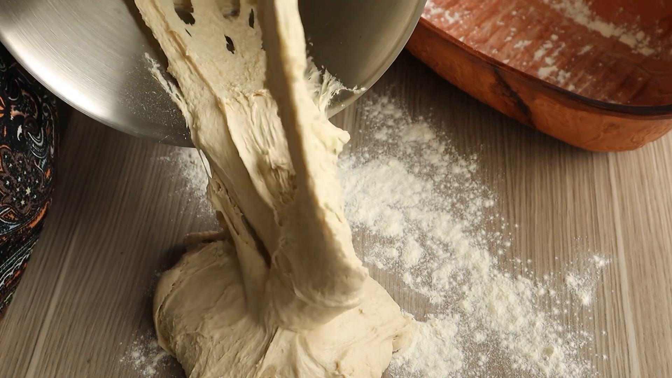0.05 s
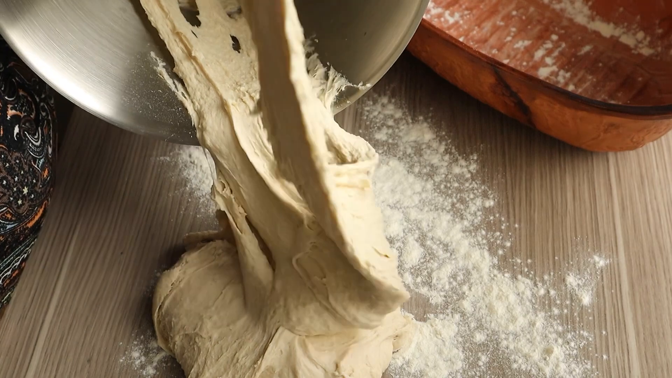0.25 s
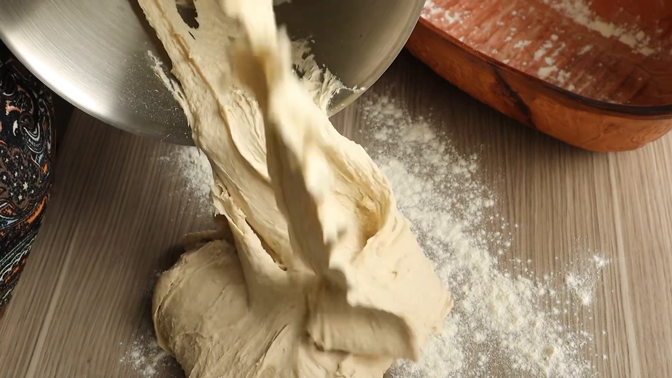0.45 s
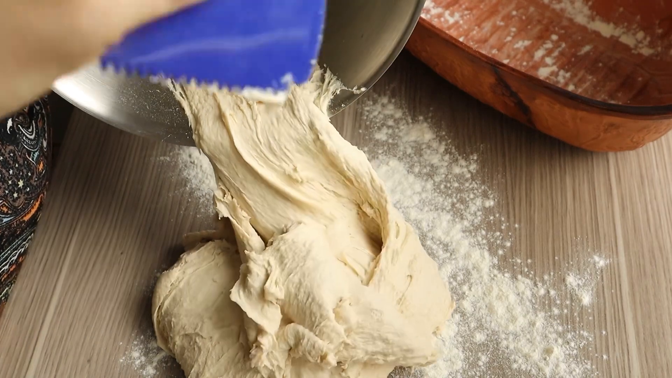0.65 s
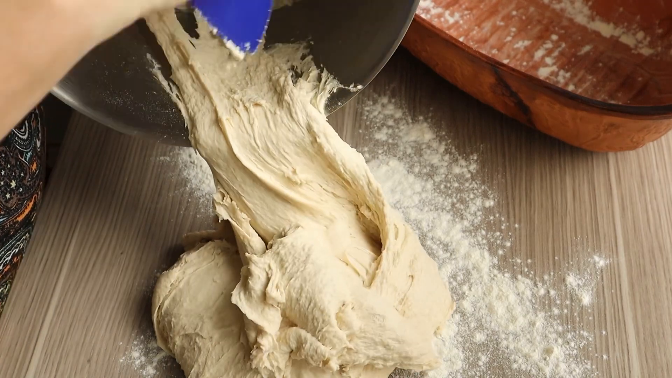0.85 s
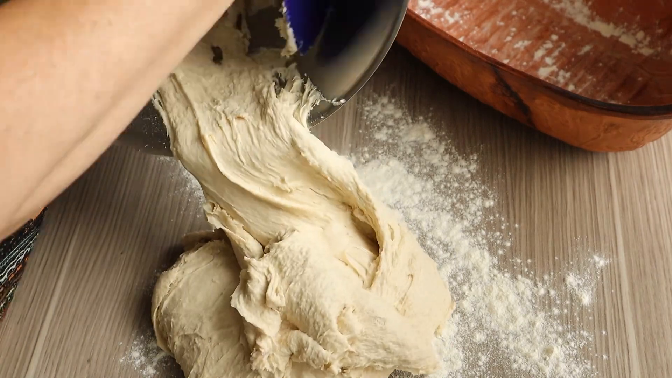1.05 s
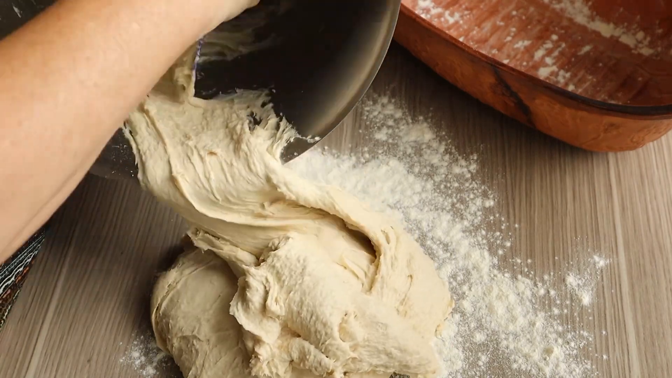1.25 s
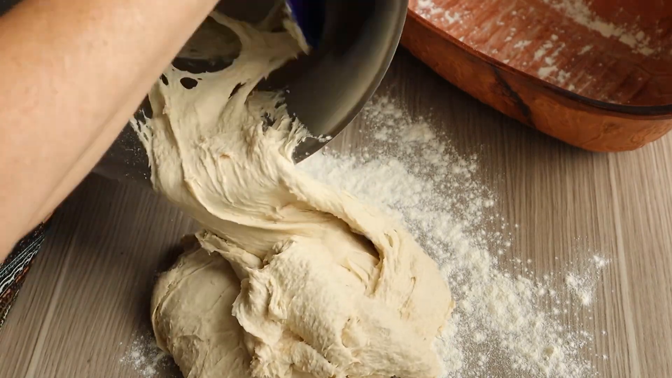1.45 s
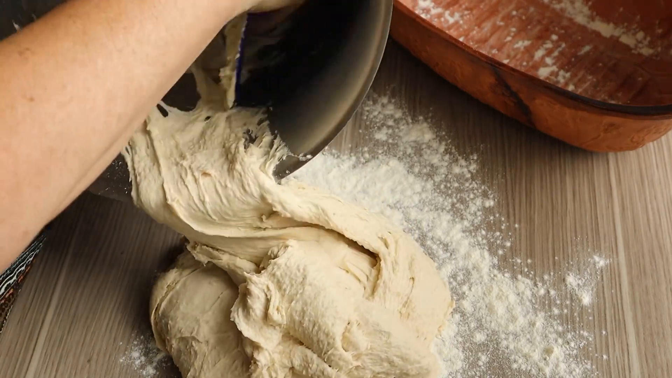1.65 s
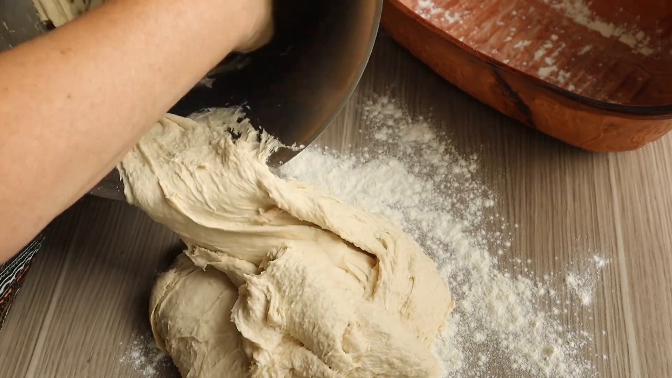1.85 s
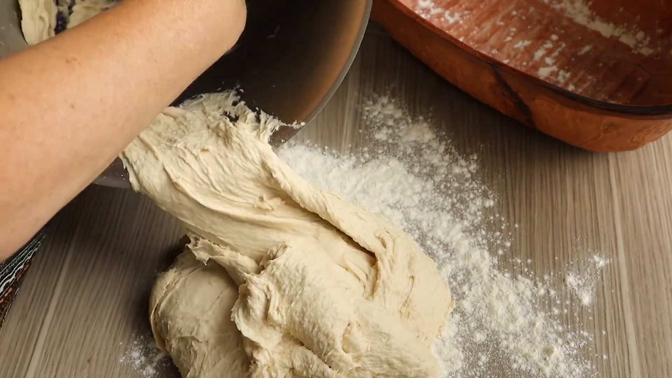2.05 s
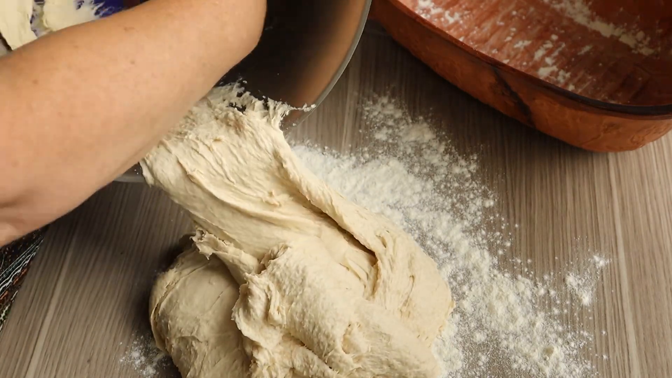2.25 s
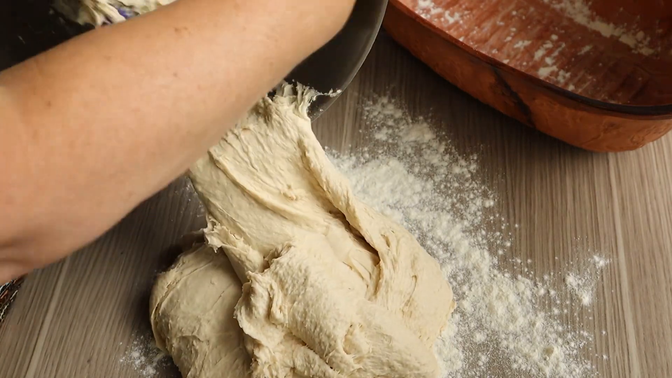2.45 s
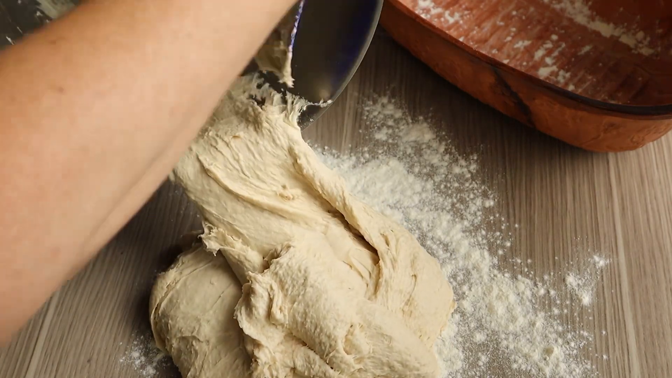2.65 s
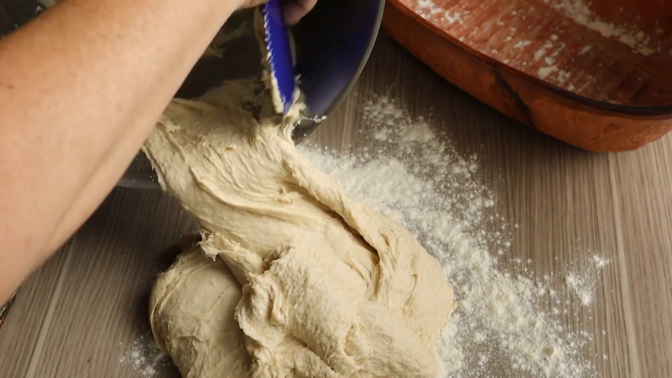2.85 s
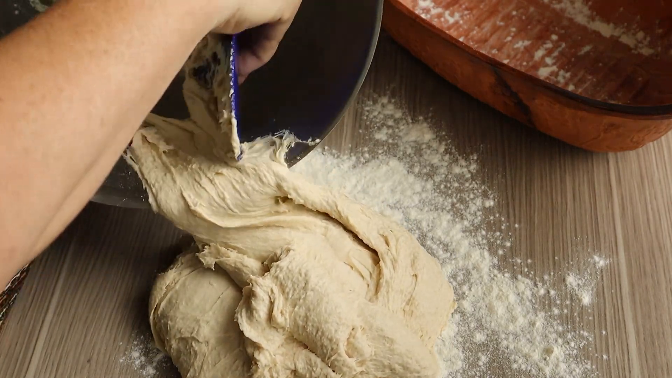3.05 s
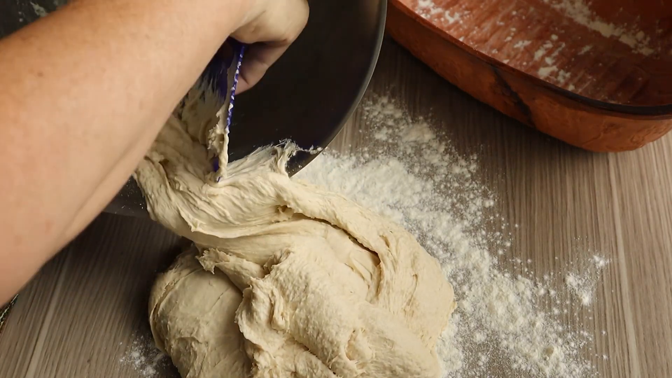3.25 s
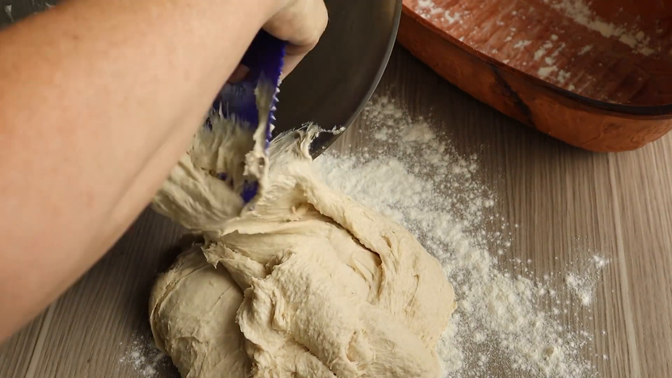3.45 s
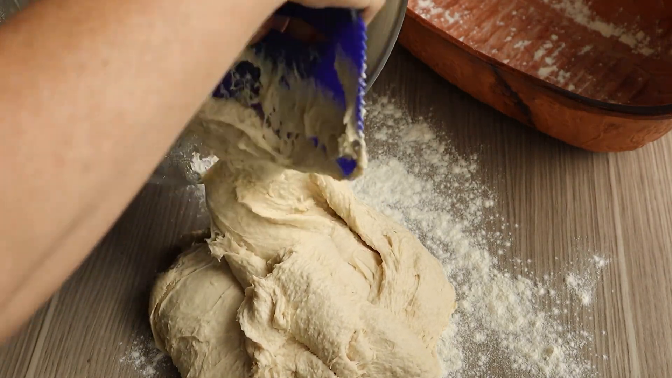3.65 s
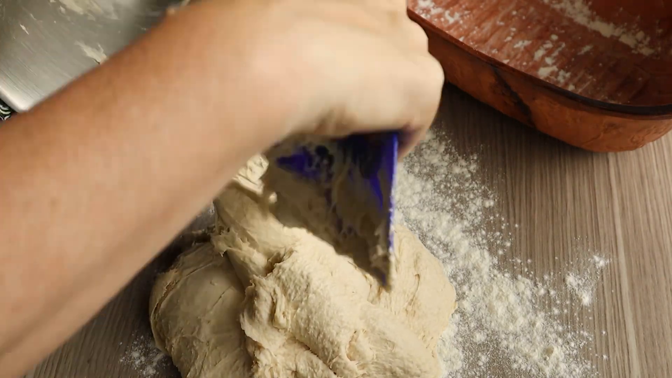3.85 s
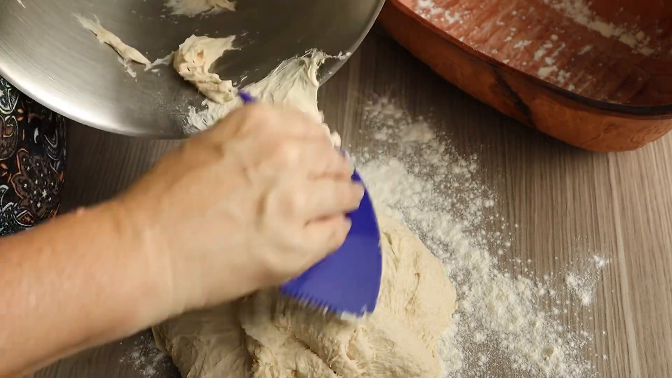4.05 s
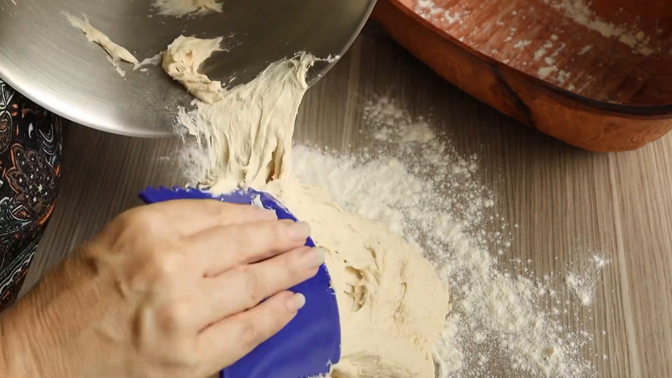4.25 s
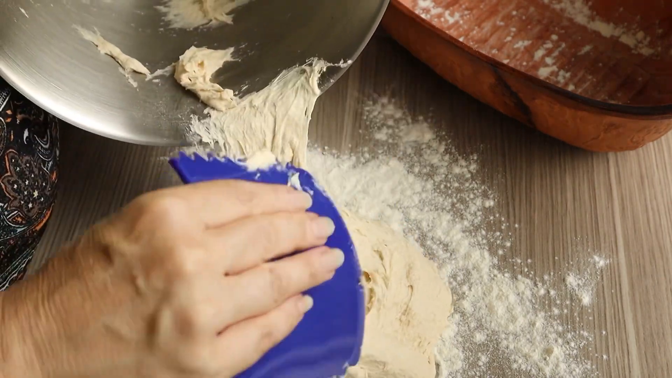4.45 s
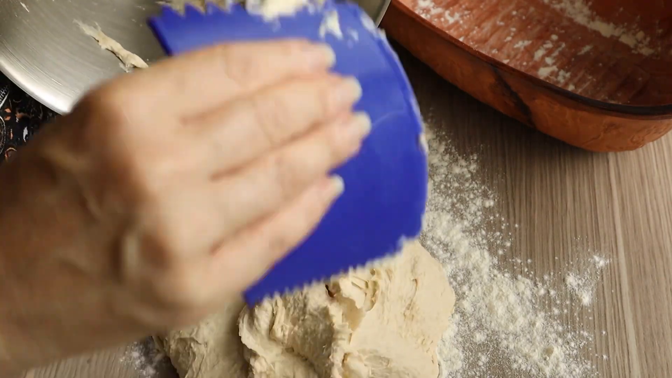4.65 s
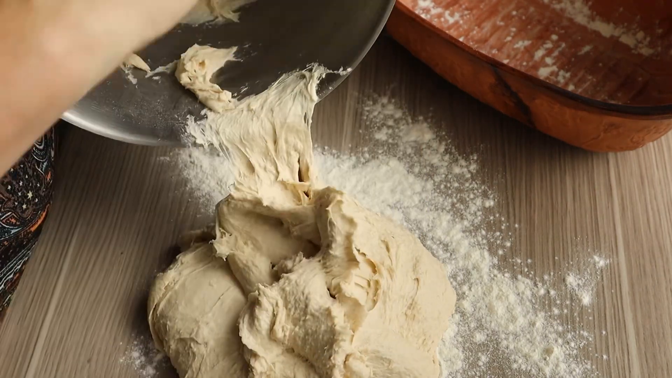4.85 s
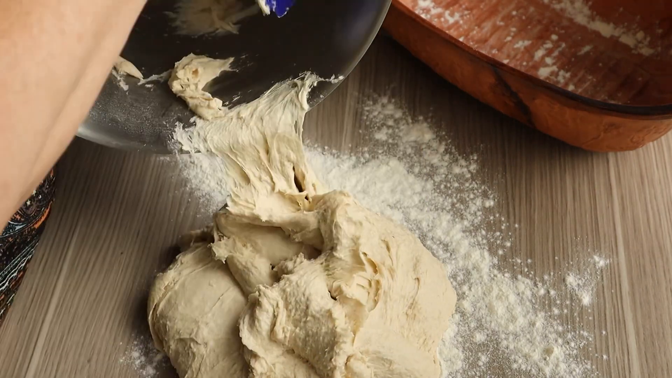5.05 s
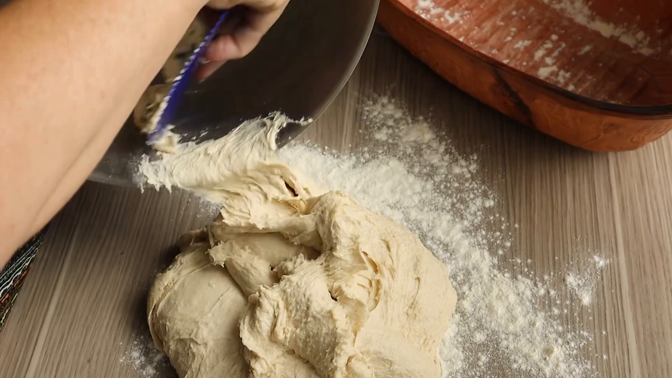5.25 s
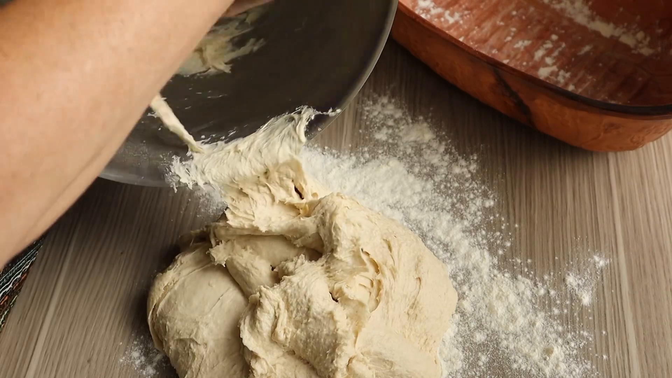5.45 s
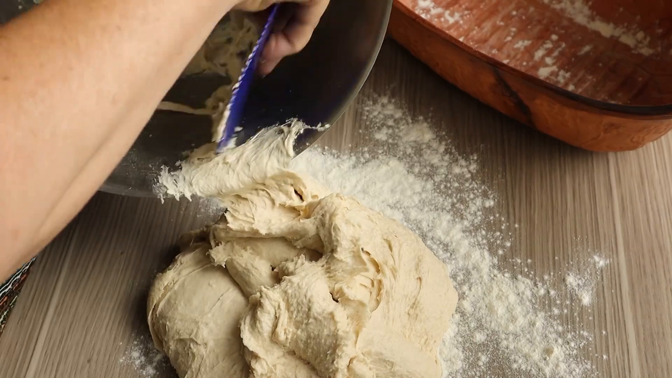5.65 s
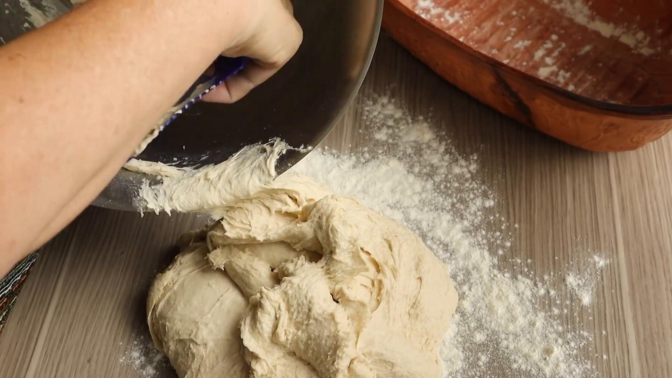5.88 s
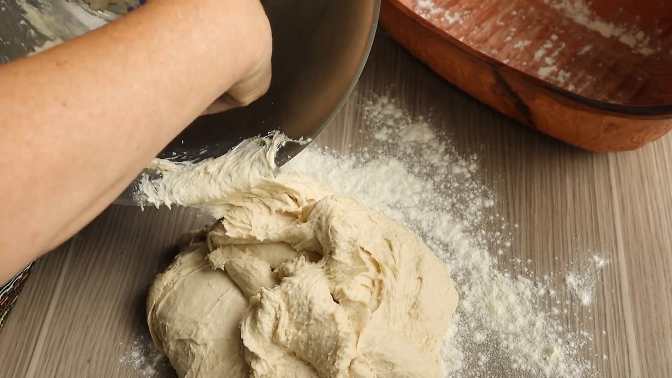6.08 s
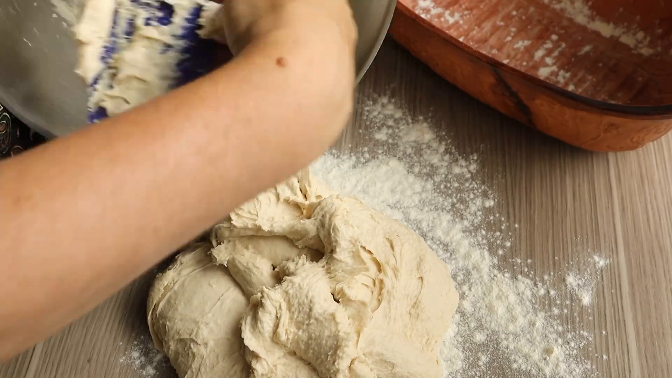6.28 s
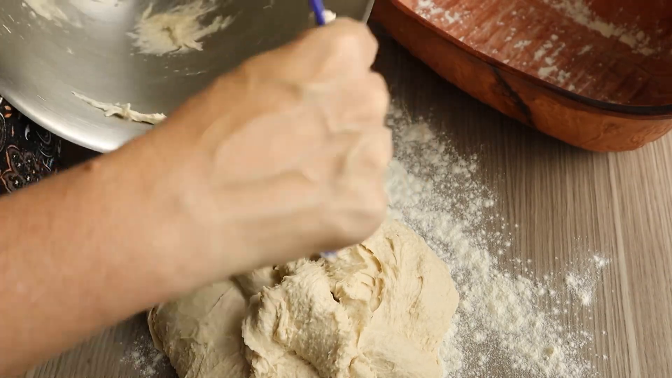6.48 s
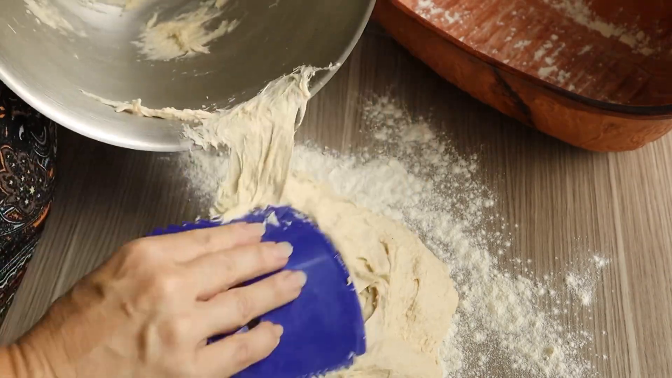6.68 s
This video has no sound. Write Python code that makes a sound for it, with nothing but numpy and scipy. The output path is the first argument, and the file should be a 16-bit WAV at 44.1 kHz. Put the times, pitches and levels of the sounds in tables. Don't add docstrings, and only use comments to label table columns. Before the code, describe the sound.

Close stereo sound of hands emptying soft dough from a steel bowl. Quiet rustle and a dull thud come first, then short gritty scrapes with brief metallic singing notes and one very sharp knock. A low boom leads to another drag. After a hushed stretch of sticky peeling, two firm knocks start the last rasps; a faint flop and tap finish over steady kitchen hum.

```python
import sys
import numpy as np
from scipy import signal
from scipy.fft import rfft, irfft
from scipy.io import wavfile
from scipy.ndimage import uniform_filter1d

SR = 44100
rng = np.random.default_rng(int(sys.argv[2]) if len(sys.argv) > 2 else 0)


def decibels_to_gain(level_db):
    exponent = np.asarray(level_db, float) / 20
    return 10 ** exponent


def file_out(sig):
    cols = np.atleast_2d(sig).T
    lim = np.clip(cols, -1, 1)
    pcm = np.round(lim * 32767).astype(np.int16)
    wavfile.write(sys.argv[1], SR, pcm)


N = 296352
T = np.arange(N) / SR

# start in seconds, swell in seconds, hold in seconds,
# level in dB, tilt in dB (plus is fast and thin, minus is slow and hollow).
PUSHES = [(1.047, 0.0027, 0.015, -27.5, 6), (1.085, 0.011, 0.011, -31, 5), (1.13, 0.0071, 0.013, -39.5, 12),
          (1.162, 0.0027, 0.0074, -31, 1), (1.2, 0.023, 0.044, -47, 0), (1.53, 0.001, 0.0067, -33.5, -2),
          (1.58, .05, 0.031, -37.5, 0.5), (1.69, 0.028, 0.098, -44.5, -2.5), (1.79, 0.064, 0.075, -38.5, 1),
          (1.93, 0.014, 0.16, -57.5, -3), (2.06, 0.18, 0.083, -47, -2), (2.295, 0.025, 0.0042, -33.5, 5),
          (2.78, 0.018, 0.07, -40.5, 7), (2.82, 0.052, 0.044, -33, 5.5), (2.96, 0.074, 0.247, -47.5, -1),
          (3.26, 0.029, 0.21, -42.5, 0), (5.152, 0.0016, 0.0073, -27, 6.5), (5.18, 0.015, 0.026, -36, 2),
          (5.255, 0.017, 0.043, -34, 1), (5.64, 0.0013, 0.21, -40, 1), (5.9, 0.019, 0.026, -41.5, 1.5),
          (5.94, 0.027, 0.073, -50, -1), (6.01, 0.046, 0.075, -37.5, 2), (6.162, 0.0033, 0.0077, -38, 4.5)]
PUSH_FADE_DB_S, BELLY_RING_DB, EDGE_HISS_DB = 263, -2.5, -7
LOW_PER_TILT, HIGH_PER_TILT = -1.65, 0.94

# middle in seconds, half length in seconds, pitch in Hz, level in dB.
SINGS = [(1.096, 0.02, 1963, 15.5), (1.15, 0.14, 2320, 7.5), (1.23, 0.033, 968, 12), (1.09, 0.036, 3400, 9),
         (1.552, 0.035, 2720, 6), (1.622, 0.02, 3604, 10), (1.738, 0.018, 950, 10),
         (1.942, 0.15, 928.4, 13), (2.077, 0.13, 1510, 4.5), (2.153, 0.16, 924, 8),
         (2.853, 0.052, 734, 12.5), (2.886, 0.028, 1960, 11.5), (2.924, 0.12, 1118, 8),
         (3.134, 0.17, 3010, 0), (3.144, 0.53, 987, 2), (3.147, 0.12, 1903, 3), (3.148, 0.13, 1600, 1),
         (3.424, 0.056, 716, 2), (3.447, 0.06, 360, -4), (5.344, 0.13, 3000, -11), (5.374, 0.058, 1960, 4),
         (5.64, 0.019, 1921, 26), (5.806, 0.15, 3000, 3.5), (5.98, 0.12, 1000, 7.5),
         (6.074, 0.076, 1504, -2)]

# pitch in Hz, width in Hz (wider dies sooner).
WALL_NOTES = [(352, 28), (735, 60), (920, 28), (965, 70), (1125, 60), (1520, 70), (1950, 32), (2365, 40),
              (2620, 60), (3025, 70), (3570, 60)]
WALL_NOTES_DB = [-9.5, -13, -11, -18.5, -8, -12, -5.5, -13, -2.5, -5, -12]
# pitch in Hz, width in Hz.
BELLY_NOTES = [(300, 45), (355, 30), (560, 70), (700, 70)]
BELLY_NOTES_DB = [2.5, 7, 0, -1]

# frequency in Hz, level in dB per Hz.
EDGE_COLOUR = [(200, -55), (500, -26), (900, -14.5), (1500, -9.5), (3000, -7), (5000, -16), (7500, -14),
               (11500, -26), (14500, -43)]
FLUTTER_DB, FLICKER_DB, PATCHY_DB = 1.5, 3, 4

# start in seconds, peak in dB, thud in dB, crack in dB, clack pitch in Hz.
KNOCKS = [(0.558, -40, -3, -24, 1920), (0.573, -18.5, -15.5, -10, 1196), (1.047, -23, -5.5, -1, 2640),
          (1.164, -18.5, -12.5, -32, 1950), (1.518, -7, -27, -5, 2820), (1.519, -8.5, -18, -20, 1236),
          (2.291, -30.5, -14.5, -13, 1030), (2.585, -51, 4, 12.5, 605), (2.772, -37, 3, -44, 825),
          (4.441, -37, -20, -7.5, 735), (4.768, -54.5, -4, 12, 830), (4.866, -36.5, -16, -25, 1700),
          (5.072, -25.5, -19, -12, 1060), (5.151, -14, -11.5, -43, 1100), (5.636, -14, -10, -11, 1074),
          (6.637, -40.5, -7, -17, 2050)]
RING_ONLY_DB = -76
CLACK_WIDTH = 1.1
STRIKE = 4

# start in seconds, swell in seconds, hold in seconds,
# level in dB, tilt in dB.
DOUGH = [(.5, 0.058, .005, -57.5, 0.5), (.571, 0.00067, 0.004, -44.5, -4), (.6, .01, 0.077, -78, -13),
         (.73, 0.015, 0.046, -64, 0), (2.575, 0.0073, 0.0062, -66, 15), (3.8, 0.084, 0.39, -62.5, -2.5),
         (4.4, 0.015, 0.15, -66.5, -2.5), (4.47, 0.0067, 0.024, -75.5, 24), (4.81, 0.022, 0.15, -63.5, 3),
         (5.03, 0.023, 0.02, -62, -3), (6.55, 0.011, 0.025, -70, 3), (6.635, 0.0022, 0.0046, -61.5, -1.5),
         (6.655, 0.0045, 0.01, -68.5, -4.5)]
DOUGH_FADE_DB_S, DULL_DB, BRIGHT_DB = 305, 1, -9.5

# start in seconds, peak in dB, pitch in Hz.
THUMPS = [
    (0.572, -38.5, 162),
    (1.161, -35, 157),
    (1.515, -35, 197),
    (2.578, -34.5, 337.4),
    (2.6, -35, 326),
    (5.15, -35.5, 159),
    (5.635, -28.5, 160),
    (5.655, -40, 345),
]
BOOM_WIDTH_HZ = 26

# frequency in Hz, time in seconds.
ROOM_T60 = [(150, 0.48), (1000, 0.33), (4000, 0.59), (12000, 0.27)]

# frequency in Hz, level in dB per Hz.
KITCHEN_COLOUR = [(20, -6), (38, -10), (55, 4.5), (80, -4), (150, -3), (300, -8), (860, -13), (1500, -18.5),
                  (2400, -21), (4000, -27), (8000, -34), (12000, -36.5), (13500, -41), (16000, -62)]
KITCHEN_DB = -54
# middle in seconds, length in seconds, pitch in Hz, level in dB.
BUMP = (3.27, .12, 32, -52)

# frequency in Hz, level in dB.
PORTS_NEAR = [(60, -18), (130, -48), (250, -16), (500, -9.5), (1000, -4), (2000, 0.5), (4000, 4.5),
              (8000, 5), (12000, 11.5), (15000, 8)]
# frequency in Hz, level in dB.
PORTS_HUM = [(60, -21), (110, -5.5), (200, 0.5), (380, 4.5), (700, 4.5), (1290, 6), (2380, 5.5), (4400, 6),
             (8120, 7), (15000, 8)]


def unit(x):
    return x / np.sqrt(np.mean(x ** 2))


def peak(x):
    return x / np.abs(x).max()


def colour(x, points):
    hz, db = np.transpose(points)
    f = np.maximum(np.fft.rfftfreq(x.shape[-1], 1 / SR), 1)
    gain = decibels_to_gain(np.interp(np.log(f), np.log(hz), db))
    return irfft(rfft(x) * gain, x.shape[-1])


def ring(x, hz, width):
    return signal.lfilter(*signal.iirpeak(hz, hz / width, fs=SR), x)


def split(x, low_hz, high_hz):
    kinds = ((low_hz, "low"), ([low_hz, high_hz], "band"), (high_hz, "high"))
    return [signal.sosfilt(signal.butter(3, hz, kind, fs=SR, output="sos"), x) for hz, kind in kinds]


def walk(rate):
    hold = int(SR / rate)
    steps = np.repeat(rng.standard_normal(N // hold + 1), hold)
    smooth = uniform_filter1d(uniform_filter1d(steps, hold), hold)
    return unit(smooth[:N])


def slips(spread_db, flutter_db):
    size_db = spread_db * rng.exponential(size=N)
    grip_db = flutter_db * walk(60)
    return unit(rng.standard_normal(N) * decibels_to_gain(size_db + grip_db))


def play(moves, fade_db_s, sound, low_hz, low_db, high_db):
    parts = np.array([unit(part) for part in split(sound, low_hz, 4600)])
    power = np.zeros((3, N))
    for s, swell, hold, db, tilt_db in moves:
        rise = np.clip((T - s) / swell, 0, 1) ** 1.43
        fade_db = fade_db_s * np.maximum(T - s - swell - hold, 0)
        balance_db = np.array([low_db + LOW_PER_TILT * tilt_db, 0, high_db + HIGH_PER_TILT * tilt_db])
        power += np.outer(decibels_to_gain(balance_db), rise * decibels_to_gain(db - fade_db)) ** 2
    return np.sum(np.sqrt(power) * parts, axis=0)


def scraper():
    force = slips(spread_db=1.77, flutter_db=FLUTTER_DB)
    wall = np.zeros(N)
    for (hz, width), rest_db in zip(WALL_NOTES, WALL_NOTES_DB):
        wall += decibels_to_gain(rest_db + FLICKER_DB * walk(14)) * ring(force, hz, width)
    for s, half, hz, db in SINGS:
        width = np.interp(hz, *np.transpose(WALL_NOTES))
        swell = np.exp(-((T - s) / half) ** 2)
        wall += decibels_to_gain(db) * swell * ring(ring(force, hz, 210), hz, width)
    hiss = colour(force, EDGE_COLOUR)
    patches = np.zeros(N)
    for hz in 300 * 2 ** np.arange(0, 5.6, .25):
        patches += decibels_to_gain(PATCHY_DB * walk(25)) * ring(hiss, hz, .14 * hz)
    return play(PUSHES, PUSH_FADE_DB_S, .7 * patches + wall, 1720, BELLY_RING_DB, EDGE_HISS_DB)


def knocks():
    out, t = np.zeros(N + SR), np.arange(SR // 2) / SR
    push = np.sin(np.pi * np.clip(t / 0.00105, 0, 1))
    belly = 0
    for (hz, width), db in zip(BELLY_NOTES, BELLY_NOTES_DB):
        belly = belly + decibels_to_gain(db) * ring(ring(push, hz, 3 * width), hz, 0.81 * width)
    thud = peak(belly)
    for s, db, thud_db, crack_db, clack_hz in KNOCKS:
        fade = np.exp(-t / 0.0097) + 0.11 * np.exp(-t / 0.015)
        chatter = rng.standard_normal(len(t)) * fade * (1 - np.exp(-t / 0.000067))
        chatter = chatter + STRIKE * np.exp(-((t - .0006) / .00005) ** 2)
        wall = 0
        for (hz, width), note_db in zip(WALL_NOTES, WALL_NOTES_DB):
            wall = wall + decibels_to_gain(note_db) * ring(chatter, hz, 1.4 * width)
        wall = ring(wall, clack_hz, 2 * clack_hz)
        clack_width = CLACK_WIDTH * clack_hz
        clack = ring(ring(chatter, clack_hz, clack_width), clack_hz, clack_width)
        clack += 2.0 * ring(chatter, clack_hz, 84)
        crack = ring(ring(chatter, 5000, 7000), 5000, 7000)
        share = np.clip(crack_db / RING_ONLY_DB, 0, 1)
        hit = share * peak(wall) + (1 - share) * peak(clack)
        hit = hit + decibels_to_gain(thud_db) * thud + decibels_to_gain(crack_db) * peak(crack)
        start = int(s * SR)
        out[start:start + len(t)] += decibels_to_gain(db) * hit
    return out[:N]


def dough():
    peel = slips(spread_db=1.2, flutter_db=1.5)
    bowl = 0.85 * ring(peel, 1300, 99) + 1.1 * ring(peel, 806, 50) + 0.48 * ring(peel, 1700, 120)
    soft = [(150, -3), (400, 3.5), (1200, 0), (2600, -12.5), (6000, -16.5), (13000, -29)]  # Hz, dB
    return play(DOUGH, DOUGH_FADE_DB_S, colour(peel + bowl, soft), 1990, DULL_DB, BRIGHT_DB)


def thumps():
    out = np.zeros(N)
    click = np.eye(1, SR // 4)[0]
    for s, db, hz in THUMPS:
        boom = peak(ring(ring(click, hz, BOOM_WIDTH_HZ), hz, 220))
        start = int(s * SR)
        out[start:start + len(boom)] += decibels_to_gain(db) * boom
    return out


def echo():
    t, out = np.arange(SR // 2) / SR, 0
    room_hz, room_s = np.transpose(ROOM_T60)
    for hz in 100 * 2. ** np.arange(7.5):
        t60 = np.interp(np.log(hz), np.log(room_hz), room_s)
        out = out + ring(rng.standard_normal(len(t)), hz, hz * .7) * decibels_to_gain(-60 * t / t60)
    out *= 1 - np.exp(-t / .004)
    return out / np.sqrt(np.sum(out ** 2))


def room(dry):
    turn = 2 * np.pi * (T / .37 + np.arange(3)[:, None] / 3)
    shares = (1 + np.cos(turn)) / np.sqrt(4.5)
    return sum(signal.oaconvolve(dry * share, echo())[:N] for share in shares)


def kitchen():
    swell = decibels_to_gain(0.27 * walk(3.82))
    mid, side = colour(rng.standard_normal((2, N)) * swell, KITCHEN_COLOUR)
    gain = decibels_to_gain(KITCHEN_DB) / mid.std()
    s, length, hz, db = BUMP
    bump = decibels_to_gain(db) * np.exp(-((T - s) / length) ** 2) * np.sin(2 * np.pi * hz * T)
    return gain * mid + bump, gain * colour(side, PORTS_HUM)


def scene():
    dry = scraper() + knocks() + dough() + thumps()
    mid = dry + decibels_to_gain(-8.0) * room(dry)
    slope = np.imag(signal.hilbert(dry)) - 0.24 * dry
    side = colour(decibels_to_gain(-5) * slope + decibels_to_gain(-5) * room(dry), PORTS_NEAR)
    hum_mid, hum_side = kitchen()
    mid, side = mid + hum_mid, side + hum_side
    return np.array([mid + side, mid - side])


def top_cut(x):
    return signal.sosfilt(signal.butter(12, 16820, fs=SR, output="sos"), x)


def record(dry):
    rounded = np.tanh(0.31 * dry) / 0.29
    top = signal.butter(8, 14300, fs=SR, output="sos")
    mix = signal.sosfilt(top, rounded)
    return top_cut(mix)


dry = scene()
out = record(dry)
file_out(out)
```